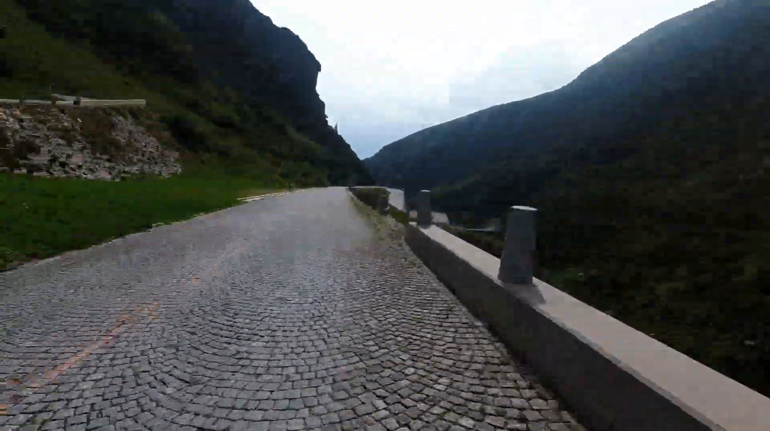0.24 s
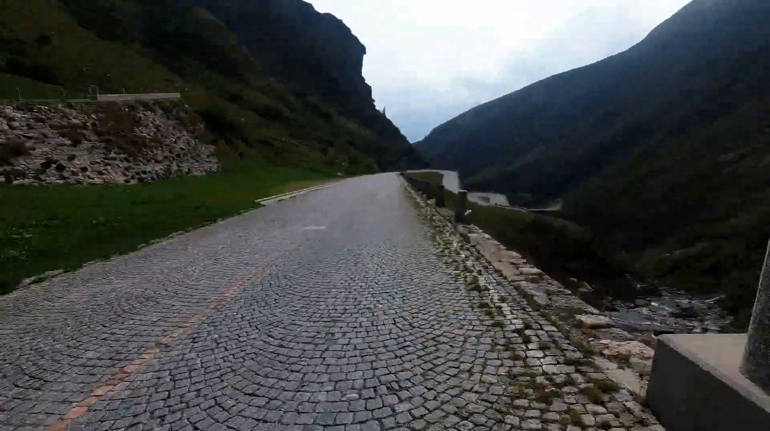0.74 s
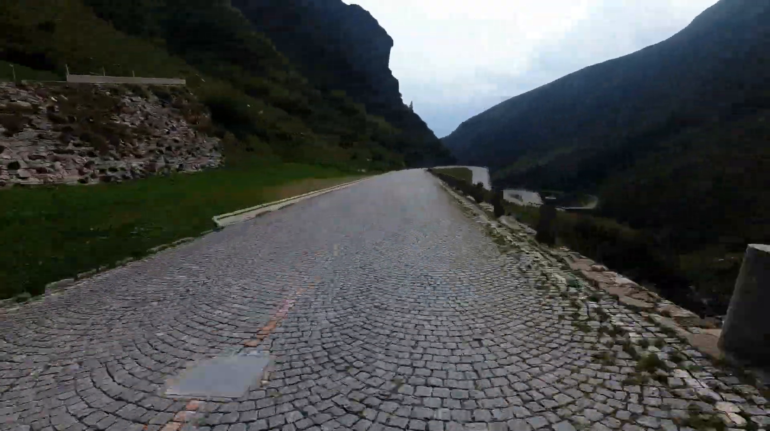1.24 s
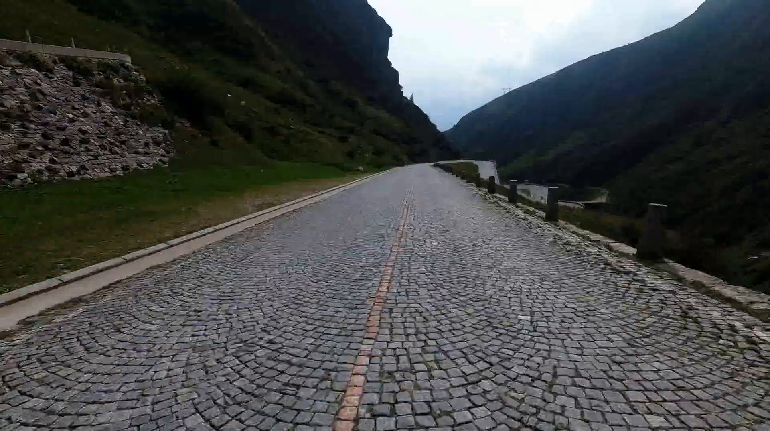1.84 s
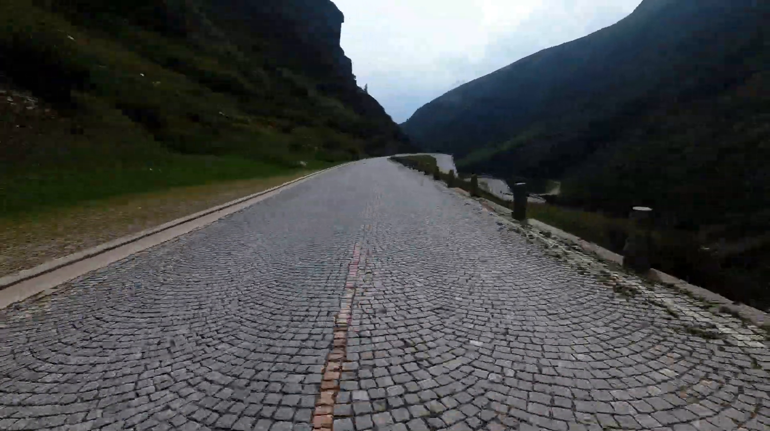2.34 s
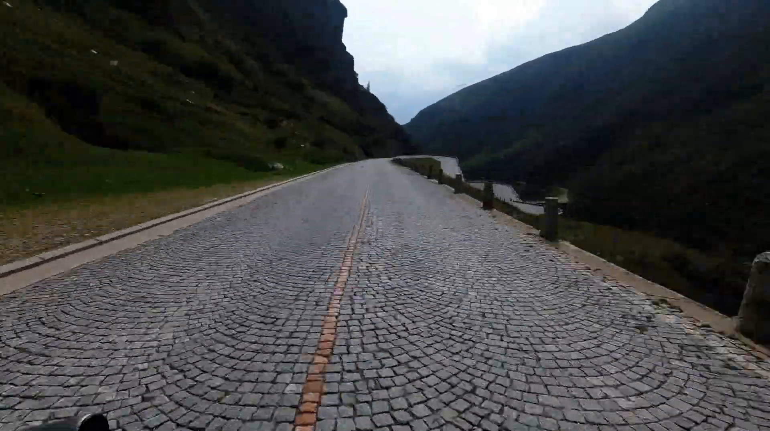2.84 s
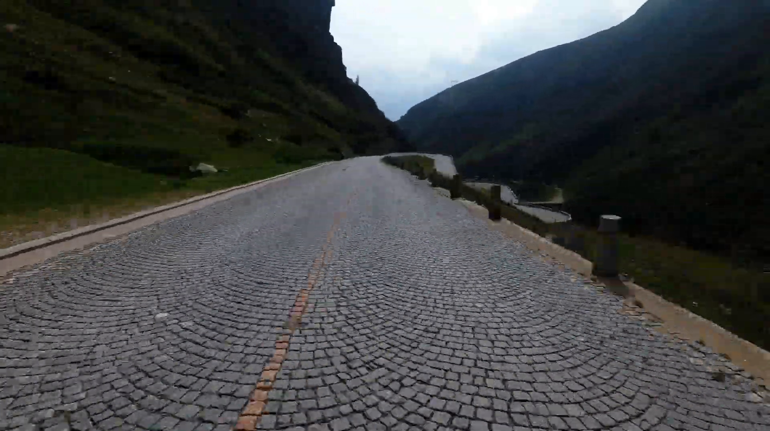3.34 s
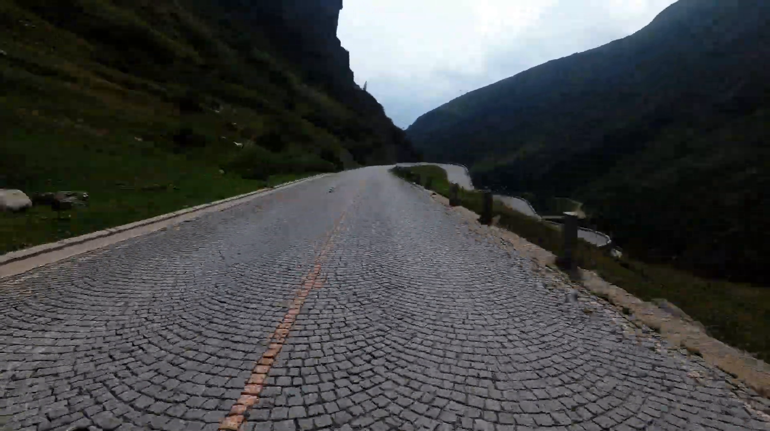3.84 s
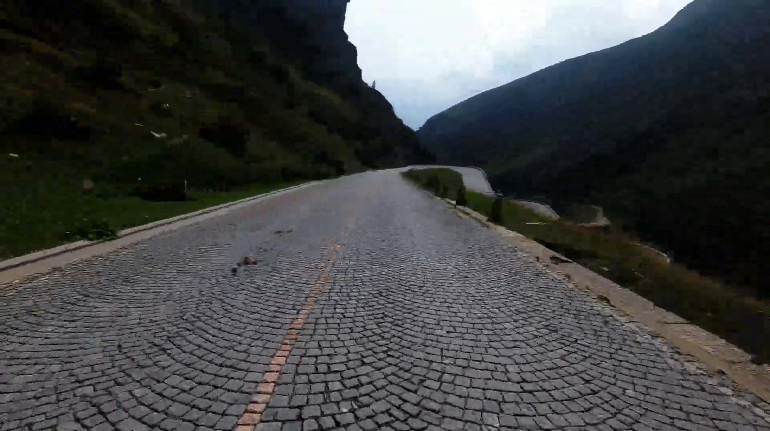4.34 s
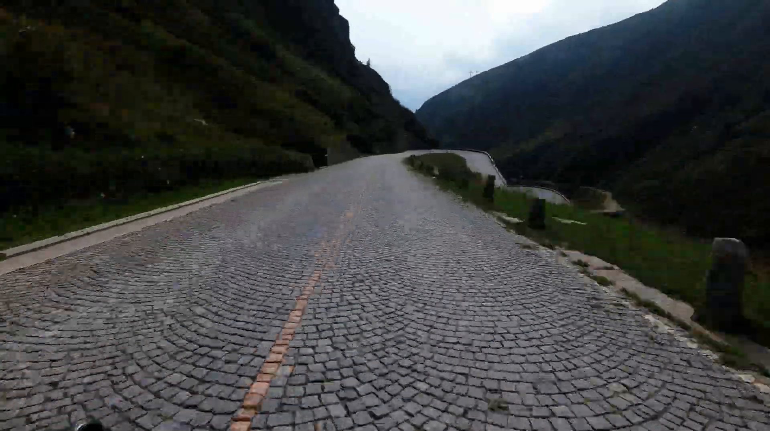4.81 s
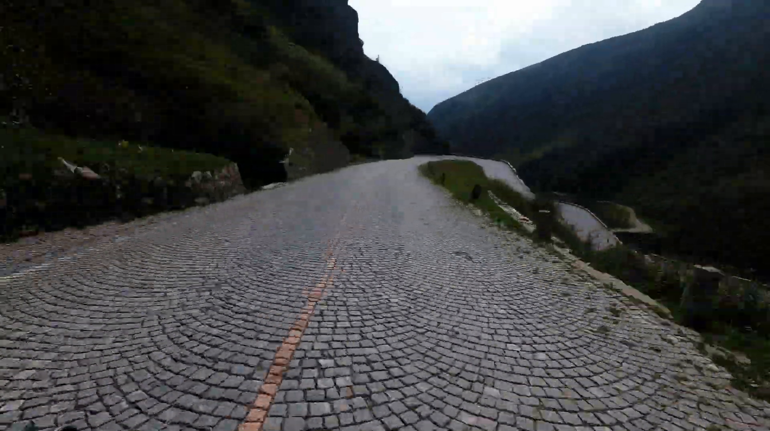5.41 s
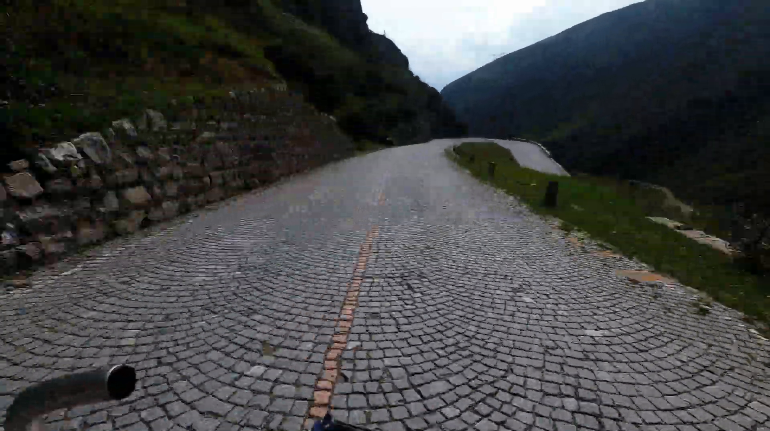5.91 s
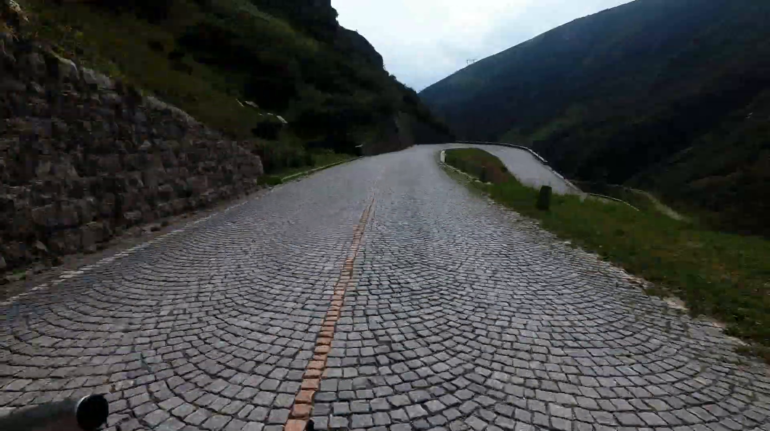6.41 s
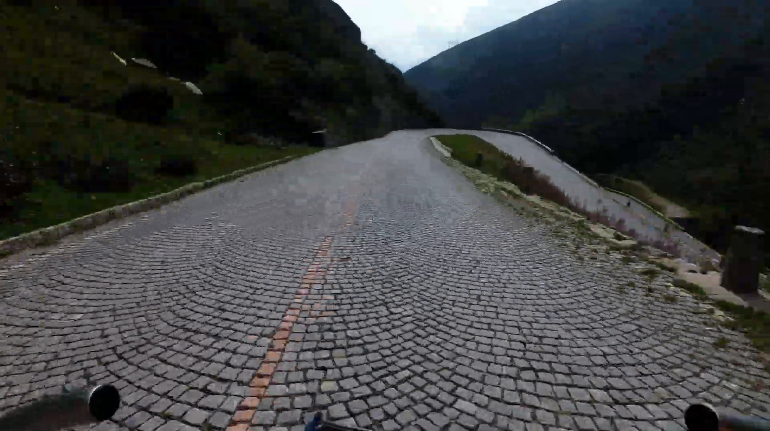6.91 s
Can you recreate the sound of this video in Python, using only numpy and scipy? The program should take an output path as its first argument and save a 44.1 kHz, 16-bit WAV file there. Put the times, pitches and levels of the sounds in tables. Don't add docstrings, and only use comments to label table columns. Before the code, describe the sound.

Rumbling tyres and chattering bike parts on cobbles grow from quiet to violent as wind thumps and crackles in the right channel.

```python
import sys
import numpy as np
from scipy import signal
from scipy.io import wavfile
from scipy.ndimage import uniform_filter1d

SR = 44100
rng = np.random.default_rng(int(sys.argv[2]) if len(sys.argv) > 2 else 0)


def dump_mix(stems):
    frames = np.atleast_2d(stems).T
    limited = np.clip(frames, -1, 1)
    pcm = np.round(limited * 32767).astype(np.int16)
    wavfile.write(sys.argv[1], SR, pcm)


def rack_gain(trim_db):
    fader = np.asarray(trim_db, float)
    return 10 ** (fader / 20)


N = 315756
LAG = 5
SHAKING, HEADWIND = 1, 2


def evened(x):
    return x / np.sqrt(np.mean(x ** 2) + 1e-20)


def colour(x, points):
    hz, db = np.transpose(points)
    grid = np.abs(np.fft.fftfreq(8192, 1 / SR)) + 1
    octaves_out = np.maximum(np.log2(hz[0] / grid), 0) + np.maximum(np.log2(grid / hz[-1]), 0)
    gain_db = np.interp(np.log(grid), np.log(hz), db) - 15.4 * octaves_out
    log_gain = np.log(rack_gain(gain_db))
    taps = np.fft.ifft(np.exp(np.conj(signal.hilbert(log_gain)))).real[:4096]
    return signal.oaconvolve(x, taps)[:len(x)]


def drift(ms):
    size = round(ms * SR / 1000)
    smooth = uniform_filter1d(rng.standard_normal(N), size)
    return evened(uniform_filter1d(smooth, size))


def hump(s, ms, flat):
    half = max(ms, 3) / 2000
    first = max(round((s - 3 * half) * SR), 0)
    last = min(round((s + 3 * half) * SR), N)
    at = np.arange(first, last)
    t = at / SR - s
    return at, t, np.exp(-np.log(2) / 2 * np.abs(t / half) ** flat)


def ports(shared, own, likeness, alike_hz):
    likeness = np.clip(likeness, 0, 1)
    band = signal.butter(1, alike_hz, "band", fs=SR, output="sos")
    mixed = likeness * shared + (np.sqrt(1 - likeness ** 2) - 1) * own
    return np.roll(shared, LAG), own + signal.sosfiltfilt(band, mixed)


def fuzz(hz, width_hz):
    r = np.exp(-np.pi * width_hz / SR)
    noise = rng.standard_normal((2, N, 2)) @ [1, 1j]
    slow = signal.lfilter([1], [1, -r], signal.lfilter([1], [1, -r], noise))
    return evened((slow * np.exp(2j * np.pi * hz * np.arange(N) / SR)).real)


def struck(t, hz, t60, rise_s):
    return (1 - np.exp(-t / rise_s)) * rack_gain(-60 * t / t60) * np.sin(2 * np.pi * hz * t)


def by_chance(count):
    draws = rng.standard_normal((count, 4))
    places = np.arange(count) + .5 + np.tanh(draws[:, 0])
    return places * N / SR / (count + 1) + 0.06, draws[:, 1:].T


def flutters(rows, unsteady, flat):
    wobble, out, cover = np.tanh(drift(2.0)), np.zeros(N), np.zeros(N)
    for (s, db, ms, hz), start in zip(rows, rng.random(len(rows))):
        at, t, shape = hump(s, ms, flat)
        turns = start + np.cumsum(hz * (1 + unsteady * wobble[at])) / SR
        out[at] += rack_gain(db) * np.sqrt(2) * shape * np.sin(2 * np.pi * turns)
        cover[at] = np.maximum(cover[at], shape)
    low_cut = signal.butter(2, 130, "high", fs=SR, output="sos")
    return signal.sosfilt(low_cut, out), cover


# (time [s], shaking from the stones [dB], steady wind at the right port [dB])
RIDE = [(0.0, -28.5, -21), (0.17, -30, -50), (0.67, -29, -48), (1.0, -28.5, -30.5), (1.5, -27, -23.5),
        (1.85, -25, -16.5), (2.16, -24, -22.5), (2.35, -26, -15.5), (2.6, -24, -15.5), (3.16, -20.5, -13),
        (3.7, -19.5, -11.5), (4.05, -20.5, -18.5), (4.6, -18, -9), (5.15, -17.5, -11), (5.26, -19.5, -13.5),
        (5.55, -18.5, -12), (6.95, -18, -13.5), (7.16, -16, -10.5)]


def ride_db(s, column):
    rows = np.array(RIDE)
    return np.interp(s, rows[:, 0], rows[:, column])


def ride(column):
    return rack_gain(ride_db(np.arange(N) / SR, column))


# (frequency [Hz], level [dB])
DRUM = [
    (25, -15),
    (58, -13),
    (240, 3),
    (524, -4),
    (775, -16),
    (1059, -22.5),
    (1338, -31.5),
    (1692, -25),
    (2500, -30),
]
# (centre time [s], peak [dB], length [ms], thud pitch [Hz])
THUDS = [(2.057, -3.5, 5.7, 256), (2.44, -12, 9.0, 272), (2.731, -12, 8.8, 287), (3.152, 0, 6.3, 298),
         (3.412, -4, 9.4, 309), (3.486, -10, 11.5, 313), (3.542, -9, 7.5, 330), (3.74, -7, 9.9, 235),
         (3.898, -3.5, 5.2, 280), (4.276, -3.5, 10.0, 241), (4.369, -3.5, 8.8, 321), (4.442, -9, 6.7, 268),
         (4.484, -4, 16.8, 316), (4.574, 1.5, 6.2, 283), (4.602, -15, 2.6, 270), (4.921, -1.5, 16, 263.5),
         (5.093, -1, 7.7, 289), (5.343, -0.5, 10.6, 269), (5.737, -2, 7.6, 313), (6.397, -11, 18.5, 330),
         (6.507, -9, 8, 306), (6.893, -16, 6.4, 303)]


def tyres():
    def pushes():
        size = rack_gain(3.74 * np.minimum(rng.exponential(1, N), 5)) * rng.choice([-1., 1.], N)
        return evened(size * (rng.random(N) < 3500 / SR))
    thuds, cover = flutters(THUDS, unsteady=0.58, flat=0.88)
    bumpy = evened(rack_gain(1.13 * drift(32))) * ride(SHAKING) * (1 - 0.28 * cover)
    left, right = ports(pushes(), pushes(), likeness=0.94, alike_hz=[120, 4000])
    drum = np.array([evened(colour(left, DRUM)), rack_gain(-1.0) * evened(colour(right, DRUM))]) * bumpy
    return drum + np.array([rack_gain(-9.5) * thuds, rack_gain(-13.0) * np.roll(thuds, -LAG)])


CHATTER_DB, CHATTER_SHARE = -26.5, 0.67


def chatter_level():
    return rack_gain(CHATTER_DB) * ride(SHAKING) ** CHATTER_SHARE


HUM_HZ, HUM_WIDTH_HZ, HUM_DB = 975, 530, -7


def tread():
    shared, own = fuzz(HUM_HZ, HUM_WIDTH_HZ)
    left, right = ports(shared, own, likeness=0.93, alike_hz=[300, 4000])
    level = rack_gain(HUM_DB + 1.0 * drift(2.1)) * chatter_level() ** 0.68
    return level * np.array([left, rack_gain(-4.5) * right])


ROLL_HZ, ROLL_WIDTH_HZ, ROLL_DB = 2317, 630, -50


def rolling():
    shared, own = fuzz(ROLL_HZ, ROLL_WIDTH_HZ)
    return rack_gain(ROLL_DB) * np.array(ports(shared, own, likeness=0.84, alike_hz=[300, 7000]))


# (centre time [s], peak [dB], length [ms], flutter [Hz])
BUFFETS = [(0.404, -9.5, 14.0, 230), (1.355, -14.5, 30.4, 230), (1.922, -4.5, 10.0, 245),
           (1.981, -12, 11.0, 240), (2.272, -4.5, 11.6, 233), (2.337, -6.5, 10, 217), (2.39, -8, 14, 237),
           (2.588, -8, 11.4, 279), (3.106, -2.5, 9.8, 383), (3.421, -4, 7, 233), (3.51, -7.5, 14.7, 272),
           (3.784, -5.5, 11.8, 258), (4.146, -8, 12.2, 373), (4.486, -4.5, 14.5, 347),
           (4.591, -2, 10.6, 271), (4.679, -1.5, 9.7, 436), (4.901, -2.5, 11.5, 348),
           (4.94, -7.5, 17.7, 381.5), (5.047, -1, 9, 391), (5.109, -2.5, 10.5, 384),
           (5.151, -11, 24.3, 327), (5.658, -1.5, 10.7, 314), (5.738, -3, 12, 325),
           (5.787, -7.5, 13.5, 382), (6.334, -4, 8.6, 222), (6.581, -11, 24, 302), (6.768, 1.5, 27.2, 338),
           (6.838, -7.5, 14, 260), (7.024, -0.5, 26.2, 316), (7.113, -2.5, 10.3, 279),
           (2.69, -11.5, 20.5, 193), (5.341, -4.5, 6, 303), (5.362, -7.5, 9.2, 390),
           (5.521, -4.5, 8.7, 347), (5.81, -14, 5.2, 307), (5.85, -9, 9, 377), (6.575, -10, 8, 262),
           (6.6, -4, 7, 277), (6.702, -7, 8.6, 283), (6.882, -8, 6, 324)]
# (centre time [s], peak [dB])
PUFFS = [(0.008, -13.5), (0.572, -14.5), (1.122, -8.5), (1.24, -16), (1.429, -12), (1.66, -5.5),
         (1.821, -1.5), (1.86, -3.5), (1.894, -9), (2.179, -3.5), (2.197, -3), (2.55, -3), (2.654, -3.5),
         (2.88, -3.5), (2.929, -3), (3.266, -1), (3.349, -13), (4.359, -2.5), (4.535, -1.5), (4.921, -0.2),
         (5.351, -11), (5.891, -2), (5.961, -4.5), (6.068, -2.5), (6.113, 0), (6.165, -2.5), (6.374, -4.5),
         (6.633, -2.5), (6.679, -2.5), (7.065, -1)]
PUFF_MS = 5.6
STRAYS, STRAY_DB, STRAY_SPREAD_DB, STRAY_MS = 140, -1.5, 1, 4.14
FLUTTER_HZ, FLUTTER_HZ_PER_DB, FLUTTER_SPREAD = 426, 7.0, 0.21


def eddy_rows():
    stray_s, (size, length, _) = by_chance(STRAYS)
    puff_s, puff_db = np.transpose(PUFFS)
    s = np.r_[puff_s, stray_s]
    stray_db = ride_db(stray_s, HEADWIND) + STRAY_DB + STRAY_SPREAD_DB * np.tanh(size)
    db = np.r_[puff_db, stray_db]
    ms = np.r_[np.full(len(PUFFS), PUFF_MS), STRAY_MS * np.exp(0.3 * length)]
    spread = np.r_[np.zeros(len(PUFFS)), FLUTTER_SPREAD * np.tanh(rng.standard_normal(STRAYS))]
    hz = (FLUTTER_HZ + FLUTTER_HZ_PER_DB * ride_db(s, SHAKING)) * (1 + spread)
    return BUFFETS + list(zip(s, db, ms, hz))


# (frequency [Hz], level [dB])
WIND = [
    (25, -21.5),
    (87, -19.5),
    (119, -16.5),
    (190, -0.1),
    (240, 1),
    (355, -4.5),
    (775, -24.5),
    (1238, -60),
    (2500, -56),
]
# (lower edge [Hz], upper edge [Hz])
TEAR_HZ = [425, 1016]


def wind():
    gusts = evened(rack_gain(1.3 * np.tanh(drift(2.9)))) * ride(HEADWIND)
    lumpy = rng.standard_normal(N) * rack_gain(0.29 * drift(7.0))
    steady = evened(colour(lumpy, WIND)) * gusts * rack_gain(-1.17)
    eddies, cover = flutters(eddy_rows(), unsteady=0.412, flat=4.8)
    band = signal.butter(3, TEAR_HZ, "band", fs=SR, output="sos")
    tearing = evened(signal.sosfilt(band, rng.standard_normal(N)))
    swing = np.abs(uniform_filter1d(np.abs(eddies), 130))
    torn = rack_gain(8.5) * gusts ** 3.78 + rack_gain(-8.5) * swing ** 2.63
    right = steady * (1 - 0.37 * cover) + rack_gain(-1.5) * eddies + torn * tearing
    breaks = cracks()
    return np.array([rack_gain(-22.0) * np.roll(breaks, LAG), right + breaks])


# (centre time [s], length [ms], heavy parts [dB], light parts [dB])
JOLTS = [(1.332, 10, -6, -10), (1.543, 3.3, 2, 3), (1.624, 4.6, 9, -6), (2.358, 7.1, 5, 0),
         (2.642, 4.1, -1, 12), (2.737, 6, 3, 4), (2.866, 4.3, 4, 12), (3.257, 5.1, -1, 3),
         (3.397, 11, 4, -4), (3.483, 7.3, 5, -1), (3.552, 7.7, 4, 3), (3.638, 6.6, 5, 2),
         (3.959, 7.3, 5, 3), (4.14, 5, 5, 3), (4.162, 4, 0, 7), (4.279, 7.6, 8, 4), (4.31, 19, 2, -2),
         (4.531, 6.5, 7, 4), (4.65, 6.5, -1, -3), (4.942, 6, 2, -3), (5.037, 4.4, -7, 3), (5.11, 4.2, 9, 2),
         (5.281, 7.9, 7, 2), (5.407, 8, 7, 1), (5.905, 22, 4, -5), (5.961, 7.5, 7, 5), (6.115, 17, 4, -5),
         (6.5, 6.1, 8, 2), (6.663, 32, 3, -4), (5.55, 5.4, -2, -2), (6.935, 5.7, 2, 3)]
RATTLES, RATTLE_MS, RATTLE_DB, RATTLE_SPREAD_DB, RATTLE_SHARE = 80, 6.0, 4.0, 3.0, .5


def jolt_rows():
    s, draws = by_chance(RATTLES)
    length, heavy, light = np.tanh(draws)
    db = RATTLE_DB + RATTLE_SHARE * ride_db(s, SHAKING)
    heavy_db = db + RATTLE_SPREAD_DB * heavy
    light_db = db + 0.4 + RATTLE_SPREAD_DB * light
    return JOLTS + list(zip(s, RATTLE_MS * np.exp(0.16 * length), heavy_db, light_db))


# (frequency [Hz], level [dB])
PORT_LEFT = [(1460, 3.5), (1900, -22), (2600, -3), (3000, -7), (3480, 0.5), (4100, -8.5), (4750, -14.5),
             (6150, -5.5), (7100, -12.5), (8100, -11.5), (9400, -14), (10900, -16.5), (12000, -20),
             (15600, -25.5)]
# (frequency [Hz], level [dB])
PORT_RIGHT = [(1460, 2), (2400, 0), (2950, -3.5), (3350, -2.5), (4300, -5), (4750, -8.5), (5500, -7),
              (6500, -11.5), (7800, -10.5), (8500, -14), (9100, -11), (10700, -13.5), (13200, -17),
              (15600, -23)]
LIGHT_SHARE = .62


def chatter():
    power = rack_gain(1.9 * np.array([drift(16), drift(16)])) ** 2
    for s, ms, heavy_db, light_db in jolt_rows():
        at, t, shape = hump(s, ms, flat=24.0)
        power[:, at] += (rack_gain(np.array([[heavy_db], [light_db + 11.5]])) * shape) ** 2

    def ticks():
        size = rack_gain(3.5 * np.minimum(rng.exponential(1, N), 3)) * (rng.random(N) < 900 / SR)
        ring = np.exp(-np.arange(200) / 13.0)
        puffs = signal.oaconvolve(size, ring)[:N] * rng.standard_normal(N)
        return evened(.55 * evened(puffs) + rng.standard_normal(N))
    both = np.array(ports(ticks(), ticks(), likeness=0.62, alike_hz=[300, 7000]))
    heavy = signal.sosfiltfilt(signal.butter(2, 6800, fs=SR, output="sos"), both)
    light = rack_gain(1.0) * (both - heavy)
    shaken = heavy * np.sqrt(power[0]) + light * np.sqrt(power[1]) ** LIGHT_SHARE
    left, right = rack_gain(12.0) * chatter_level() * shaken
    return np.array([colour(left, PORT_LEFT), colour(right, PORT_RIGHT)])


PAWL_HZ, PAWL_WIDTH_HZ, PAWL_DB, PAWL_PER_S = 11700, 1100, -55.5, 330


def freewheel():
    size = rack_gain(2.5 * rng.standard_normal(N)) * (rng.random(N) < PAWL_PER_S / SR)
    gate = signal.oaconvolve(size, np.hanning(260))[:N]
    return rack_gain(PAWL_DB) * evened(gate) * fuzz(PAWL_HZ, PAWL_WIDTH_HZ)


WHINE_HZ, WHINE_WIDTH_HZ = 15714, 110
WHINE_DB = [
    [-70],
    [-60],
]
HISS_DB = [
    [-77],
    [-67],
]


def whine():
    hiss = rack_gain(np.array(HISS_DB)) * rng.standard_normal((2, N))
    return rack_gain(np.array(WHINE_DB)) * fuzz(WHINE_HZ, WHINE_WIDTH_HZ) + hiss


# (time [s], peak [dB], pitch [Hz])
KNOCKS = [(1.3265, -28, 2520), (1.6234, -27.5, 2360), (1.7566, -28, 2030), (2.027, -29, 2510),
          (2.3537, -34, 2740), (2.5503, -28, 2590), (2.7204, -30, 2510), (2.7663, -27.5, 2090),
          (2.9279, -33, 2400), (3.5191, -37, 2030), (3.549, -35, 2120), (3.6358, -29, 3170),
          (3.7685, -32, 2560), (3.7929, -26, 2440), (3.8398, -33, 2290), (3.9561, -30, 2030),
          (4.1377, -34, 3320), (4.2753, -28, 2880), (4.3926, -26, 2000), (4.426, -32, 2050),
          (4.4564, -37, 2080), (4.5906, -30, 2500), (4.6465, -25, 2020), (4.7513, -41, 3440),
          (4.8737, -20, 2230), (4.9396, -34, 2490), (5.0822, -39, 2100), (5.1057, -34, 2510),
          (5.2314, -26, 2050), (5.2808, -33, 2130), (5.4748, -32, 2370), (5.5247, -22, 2610),
          (5.5467, -24, 2400), (5.5756, -24, 2480), (5.635, -24, 2410), (5.9483, -25, 2050),
          (6.0051, -26, 2440), (6.0914, -33, 2130), (6.1099, -27, 2200), (6.1438, -23, 2340),
          (6.2142, -28, 2120), (6.3414, -32, 2440), (6.4112, -19, 3360), (6.4446, -34, 2550),
          (6.6721, -24, 2000), (6.731, -23, 3300), (6.7534, -18, 2440), (6.8008, -25, 2260),
          (6.8472, -33, 2530), (6.9335, -36, 2540), (6.9919, -24, 3380), (7.0193, -28, 2260),
          (7.0622, -27, 2390), (7.1081, -27, 2190)]
# (frequency [Hz], level [dB], decay t60 [s])
KNOCK_MODES = [
    (2360, -15, 0.014),
    (3490, -9, 0.018),
]


def knocks():
    out, t = np.zeros(N + 2000), np.arange(2000) / SR
    for (s, db, hz), (a, b, c) in zip(KNOCKS, rng.standard_normal((len(KNOCKS), 3))):
        ring = struck(t, hz, t60=0.0099, rise_s=0.00063)
        for (mode_hz, mode_db, t60), chance in zip(KNOCK_MODES, (a, b)):
            tube = struck(t, mode_hz * (1 + 0.039 * c), t60, rise_s=0.00048)
            ring = ring + rack_gain(mode_db + 2.6 * np.tanh(chance)) * tube
        out[round(s * SR):][:len(t)] += rack_gain(db + 3.0) * ring
    return np.array([np.roll(out[:N], LAG), rack_gain(6.0) * out[:N]])


SNAP_S = 4.79965
# (time [s], peak [dB])
TICKS = [(1.5405, -34.5), (1.6236, -38), (2.356, -35), (2.6259, -37), (2.6399, -40), (2.696, -32),
         (2.7344, -33), (2.865, -29), (2.9294, -34), (3.256, -36), (3.3742, -44), (3.393, -34),
         (3.483, -25.5), (3.5493, -31), (3.6611, -33), (3.7703, -33), (3.8392, -32), (3.953, -33),
         (4.119, -43), (4.1583, -32), (4.2735, -29), (4.3005, -30), (4.357, -25), (4.3919, -32),
         (4.425, -34), (4.4603, -33), (4.4837, -27), (4.5291, -31), (4.5905, -32), (4.646, -33),
         (4.681, -25), (4.799, -12), (4.9408, -26.5), (4.971, -31), (5.0165, -32), (5.035, -28),
         (5.0858, -29), (5.1087, -29), (5.2265, -33), (5.2797, -33), (5.4031, -31), (5.465, -33),
         (5.4927, -25.5), (5.547, -31), (5.7555, -33.5), (5.8077, -26), (5.8606, -40), (5.9486, -36),
         (6.0013, -32), (6.0636, -28), (6.094, -25.5), (6.144, -26), (6.411, -29), (6.4457, -31),
         (6.499, -33), (6.617, -41), (6.656, -35), (6.7301, -25.5), (6.9331, -28.5), (7.0609, -30)]
TICK_DECAY_MS, TICK_DB = 3.5, 10
TICK_BODY_DB = -4.0


def ticking():
    apart = [row for row in TICKS if abs(row[0] - SNAP_S) > .005]
    s, db = np.transpose(apart)
    train = np.zeros(N)
    train[np.round(s * SR).astype(int)] = rack_gain(db + TICK_DB)
    decay = np.exp(-np.arange(900) / SR * 1000 / TICK_DECAY_MS)
    gate = signal.oaconvolve(train, decay)[:N]
    left, right = ports(*rng.standard_normal((2, N)), likeness=1.0, alike_hz=[300, 7000]) * gate
    body = rack_gain(TICK_BODY_DB) * gate * fuzz(1.2 * HUM_HZ, HUM_WIDTH_HZ)[0]
    return np.array([colour(left, PORT_LEFT) + np.roll(body, LAG), colour(right, PORT_RIGHT) + body])


# (time [s], peak [dB], centre frequency [Hz])
CRACKS = [(1.661, -20, 643), (1.82, -25, 840), (2.194, -21, 815), (2.268, -17, 597), (2.926, -9, 600),
          (3.1, -4, 613), (3.178, -11, 625), (3.302, -10.5, 637), (3.356, -13, 620), (3.481, -12, 644),
          (3.547, -11, 620), (3.885, -12, 680), (4.032, -16, 610), (4.28, -10.5, 640), (4.433, -17, 620),
          (4.478, -4, 604), (4.518, -13, 620), (4.534, -7, 600), (4.556, -14, 694), (4.569, -7, 676),
          (4.59, -6, 605), (4.64, -14, 646), (4.675, -21, 670), (4.803, -10.5, 720), (4.827, -19, 736),
          (4.871, -6, 620), (4.904, -7, 734), (5.0, -9, 606), (5.085, -4, 620), (5.151, -17, 610),
          (5.173, -11, 634), (5.267, -9.5, 700), (5.36, -27, 622), (5.505, -8, 645), (5.552, -21, 880),
          (5.581, -7.5, 725), (5.726, -7, 696), (5.78, -7, 610), (5.901, -7, 640), (6.052, -7, 596),
          (6.111, -4, 680), (6.179, -15, 790), (6.214, -12, 625), (6.371, -16, 953), (6.498, -24, 646),
          (6.57, -29, 1000), (6.581, -6.5, 580), (6.63, -20, 686), (6.648, -16, 640), (6.666, -5, 604),
          (6.732, -14, 630), (6.752, -6, 635), (6.814, -11, 630), (7.014, -6, 950), (7.113, -12, 624)]


def cracks():
    out, t = np.zeros(N + 2000), np.arange(2000) / SR
    sides = np.sign(rng.standard_normal(len(CRACKS)))
    for (s, db, hz), side in zip(CRACKS, sides):
        swing = struck(t, hz, t60=0.022, rise_s=0.0014)
        swing = swing + 0.2 * struck(t, 1.6 * hz, t60=0.012, rise_s=0.00023)
        out[round(s * SR):][:len(t)] += side * rack_gain(db + 7.0) * swing
    return out[:N]


# (frequency [Hz], left level [dB], right level [dB], decay t60 [s])
SNAP = [
    (1820, -17, -10, 0.011),
    (2250, -13, 2, 0.0055),
    (3650, -7, -13, 0.005),
    (5300, -14, -10, 0.004),
    (7200, -20, -11, 0.004),
    (9400, -23, -17, 0.004),
    (11800, -26, -21, 0.005),
    (13500, -22, -22, 0.004),
]


def snap():
    t, out = np.arange(1500) / SR, np.zeros((2, N))
    ring = np.zeros((2, len(t)))
    for k, (hz, left_db, right_db, t60) in enumerate(SNAP):
        level = rack_gain(np.array([[left_db], [right_db]]) - 60 * t / t60)
        ring += (-1) ** k * level * np.sin(2 * np.pi * hz * t)
    ring *= 1 - np.exp(-t / 0.000045)
    for port, late in enumerate([1, 0]):
        out[port, round(SNAP_S * SR) + late:][:len(t)] = ring[port]
    return out


def scene():
    road = tyres() + tread() + rolling()
    parts = chatter() + freewheel() + knocks() + ticking() + snap()
    return road + wind() + parts + whine()


def band_limit(x):
    return signal.sosfilt(signal.butter(12, 16450, fs=SR, output="sos"), x)


def record(dry):
    ceiling, knee = 0.995, 7.0
    held = dry / (1 + np.abs(dry / ceiling) ** knee) ** (1 / knee)
    low_pass = signal.firwin(1023, 15790, window=("kaiser", 9), fs=SR)
    limited = signal.oaconvolve(held, low_pass[None], "same")
    return band_limit(np.clip(limited, -1, 1))


dry = scene()
out = record(dry)
dump_mix(out)
```